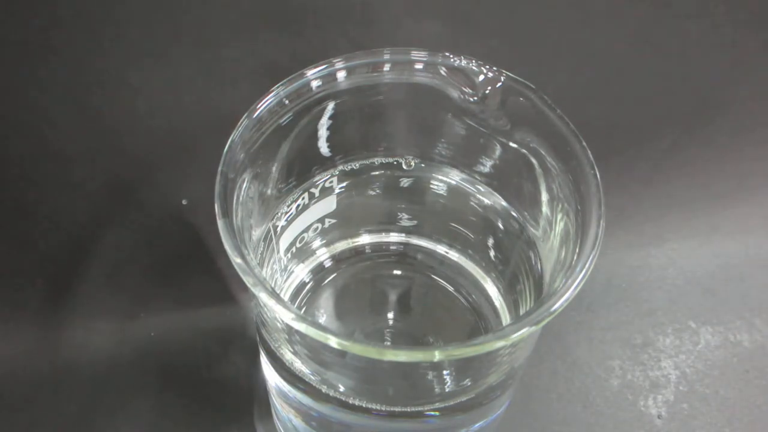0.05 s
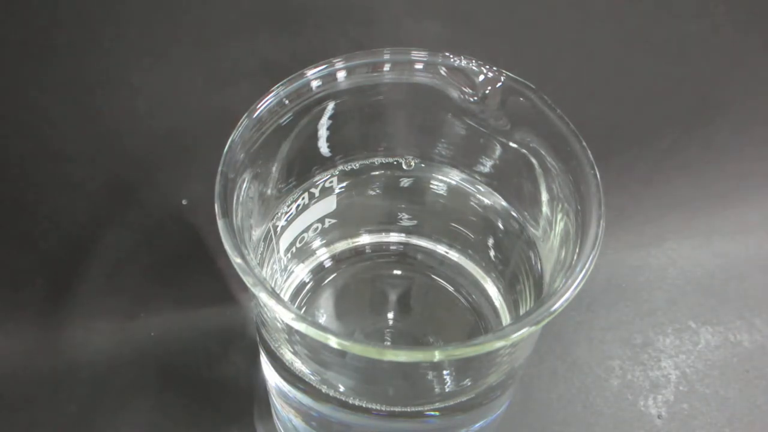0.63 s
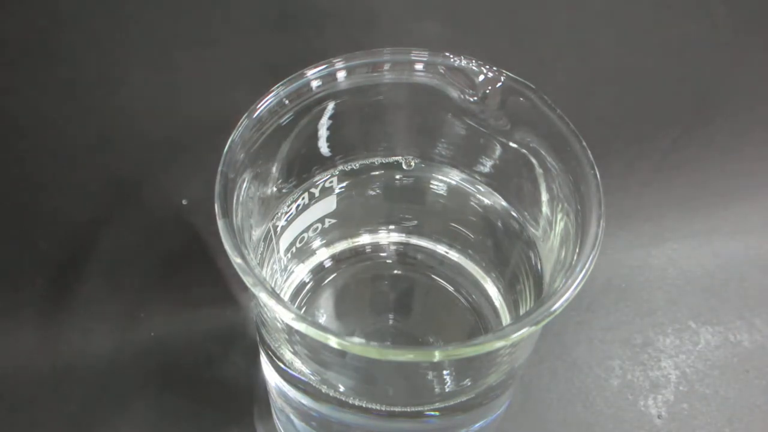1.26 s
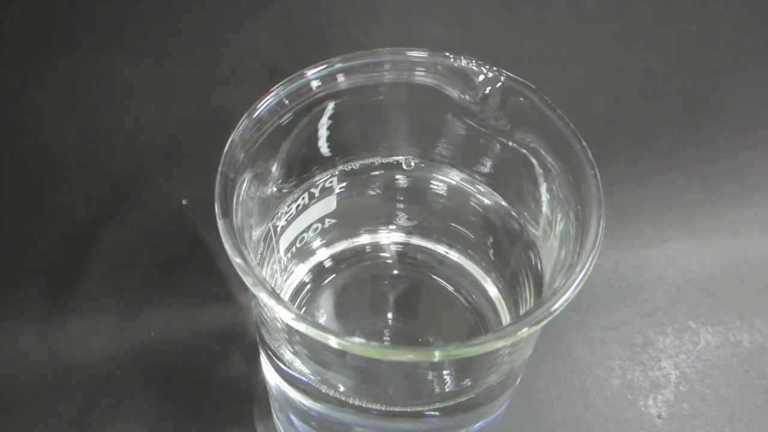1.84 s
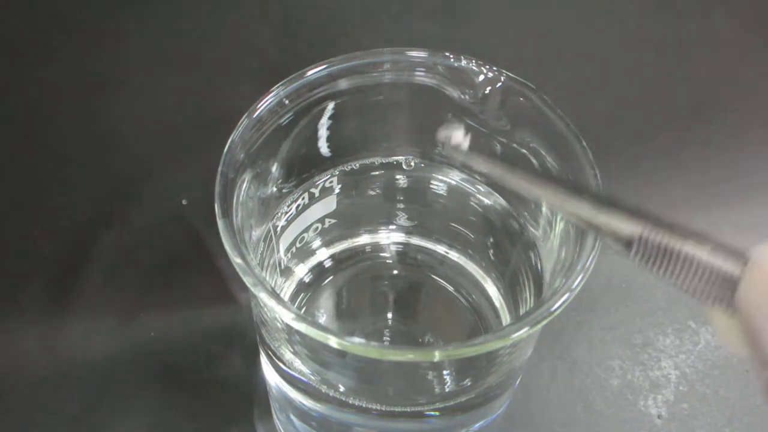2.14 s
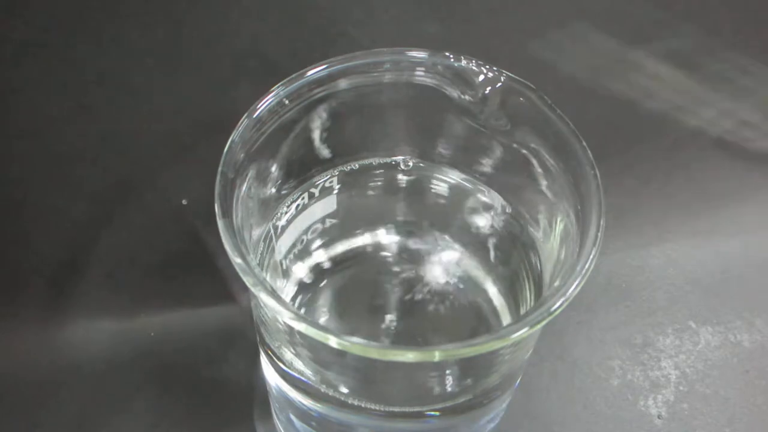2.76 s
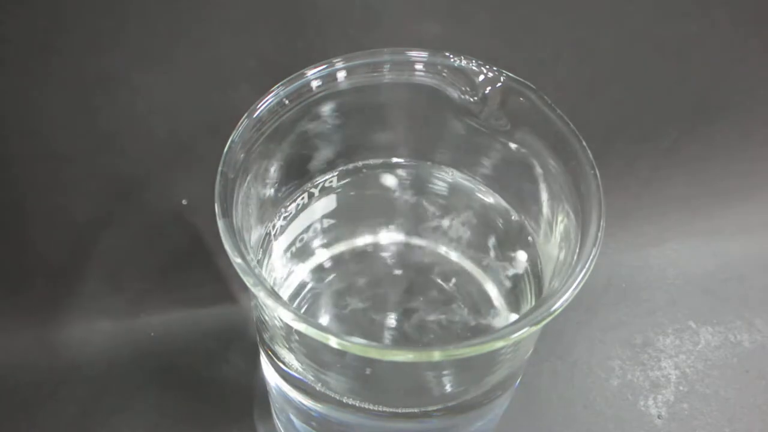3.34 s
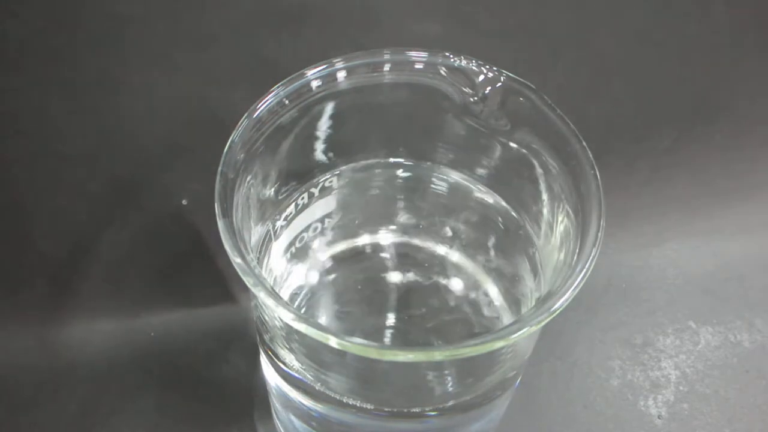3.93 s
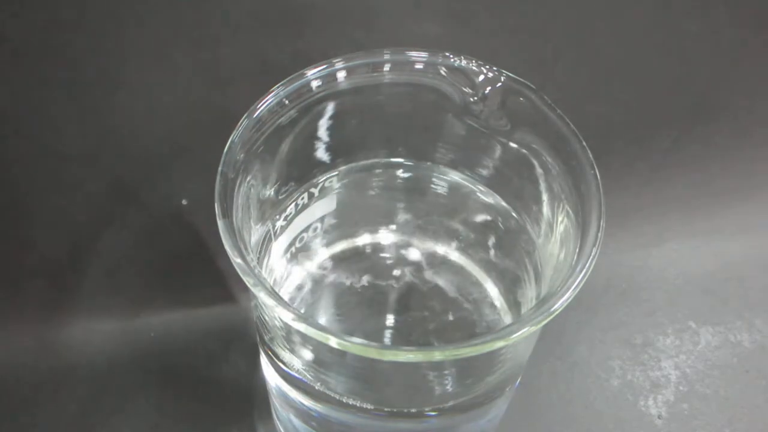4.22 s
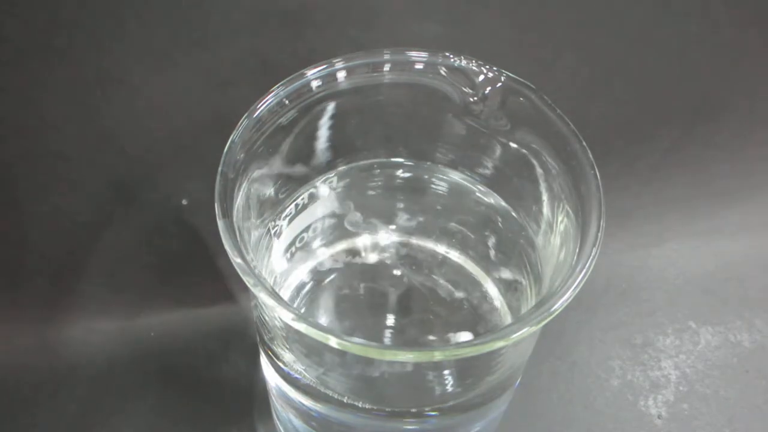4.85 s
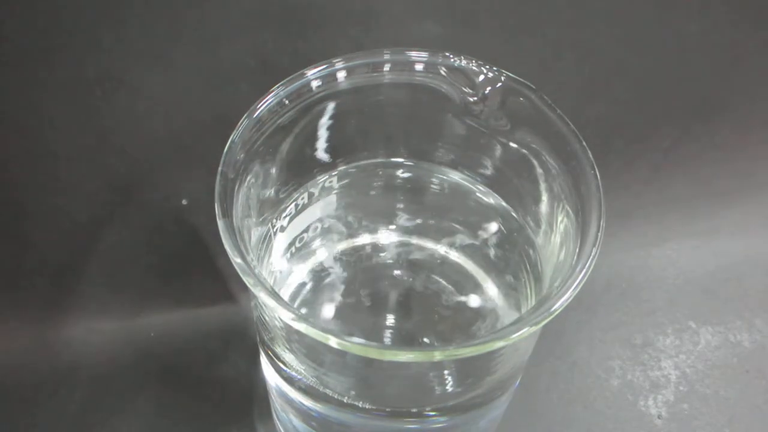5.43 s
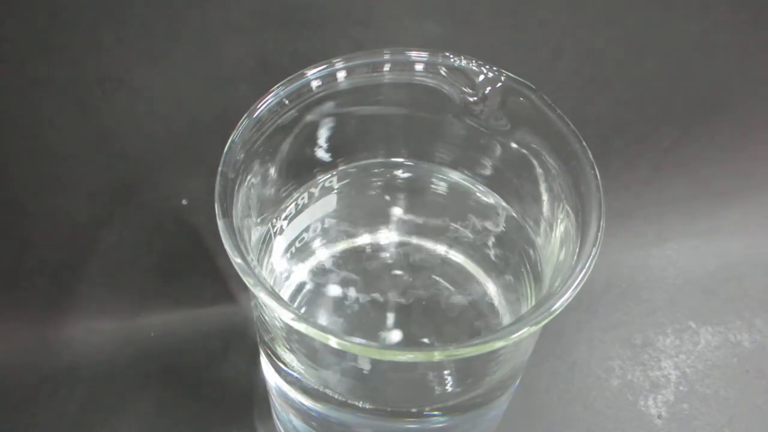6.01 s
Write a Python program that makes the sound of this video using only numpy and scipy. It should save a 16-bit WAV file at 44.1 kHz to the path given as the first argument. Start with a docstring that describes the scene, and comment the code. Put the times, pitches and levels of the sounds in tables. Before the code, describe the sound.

Laboratory ventilation hums softly throughout. During the first two seconds there are a few small taps on the bench, the clearest at about 0.5 seconds, along with a very faint, high pulsing whine, a distant squeak near 0.8 seconds and two soft brushes of a sleeve. At 2.2 seconds steel tweezers hit the rim of a glass beaker with a sharp, close clink and a lighter bounce, and the glass rings briefly. A faint hiss swells. From about 2.8 seconds bits of sodium fizz in the water: a dense, bright sizzle of tiny gas pops, with deeper bubbling underneath that fades by about 4 seconds. The fizz is strongest around 3.5 seconds, then continues fairly steadily until the end at about 6 seconds, its slightly hollow tone shifting as the metal skates around the beaker. The room adds very little echo.

```python
"""A laboratory: ventilation hums under a faint pulsing whine, a few small taps, a far squeak and a sleeve.
At 2.2 s steel tweezers clink on a glass beaker, ringing both, and drop bits of sodium into the water.
A faint hiss swells. From about 2.8 s the metal skates about and fizzes: thousands of tiny gas pops a
second, coloured by the air column of the beaker. The fresh pieces also bubble deeply until they shrink."""
import sys
import numpy as np
from scipy import signal
from scipy.fft import rfft, irfft
from scipy.io import wavfile
from scipy.ndimage import uniform_filter1d

SR = 44100
rng = np.random.default_rng(int(sys.argv[2]) if len(sys.argv) > 2 else 0)


def dump(signal):
    """Clip the signal to [-1, 1] and save it as 16-bit WAV at the path in sys.argv[1]."""
    limited = np.clip(np.atleast_2d(signal).T, -1, 1)
    pcm = np.round(limited * 32767).astype(np.int16)
    wavfile.write(sys.argv[1], SR, pcm)


N = 268128
T, HZ = np.arange(N) / SR, np.fft.rfftfreq(N, 1 / SR)


def amp(db):
    """Decibels to linear gain."""
    return 10 ** (np.asarray(db) / 20)


def unit(x):
    """Scale to an rms of one."""
    return x / np.sqrt(np.mean(x ** 2) + 1e-20)


def curve(points, hz):
    """An EQ-style curve: points joined by straight lines over log frequency."""
    point_hz, value = np.transpose(points)
    return np.interp(np.log(hz + 1), np.log(point_hz + 1), value)


def pan(pan_db):
    """Left and right gains whose mean is one; pan_db is always left minus right."""
    left = np.atleast_1d(amp(pan_db))
    return 2 * np.array([left, np.ones_like(left)]) / (1 + left)


def add(mix, start_s, sound):
    """Lay a sound into the stereo mix."""
    part = mix[:, round(start_s * SR):][:, :sound.shape[-1]]
    part += sound[..., :part.shape[1]]


def drift(rate_hz):
    """A random modulator with an rms of one."""
    knots = np.arange(4096) / (2 * rate_hz)
    return unit(np.interp(T, knots, rng.standard_normal(len(knots))))


def swell(t, peak_s, half_length_s):
    """A bell-shaped fade in and out of height one."""
    return np.exp(-((t - peak_s) / half_length_s) ** 2)


def stereo_spectra(two_noises, correlation, balance):
    """Blend two unrelated noises into left and right spectra, with width and pan set by frequency."""
    a, b = rfft(two_noises)
    shared = np.clip(curve(correlation, HZ), -1, 1)
    return np.array([a, shared * a + np.sqrt(1 - shared ** 2) * b]) * pan(curve(balance, HZ))


# Decay of the room: freq_hz, t60_s
ROOM_DECAY = [(200, .5), (2000, 0.3), (6000, 1), (15000, 0.3)]

def room(x, predelay_s=0.008):
    """A diffuse reverb tail on each side, each band dying at its own speed."""
    noise = rng.standard_normal((2, SR)) * (T[:SR] > predelay_s)
    hz, t, bands = signal.stft(noise, SR, nperseg=256)
    tail = signal.istft(bands * amp(-60 * t / curve(ROOM_DECAY, hz)[:, None]), SR, nperseg=256)[1]
    return signal.fftconvolve(x.mean(0)[None], tail / np.linalg.norm(tail[0]), axes=1)[:, :N]


# Tone of the air bed: freq_hz, gain_db
VENT_EQ = [(41, -29), (70, -7.5), (189, -7), (265, -5.5), (297, -4), (356, -10.5), (535, -15.5), (734, -17),
           (860, -19), (1770, -26), (2320, -30.5), (4090, -40.5), (5610, -42), (14500, -50), (15500, -44.5)]
# Its stereo width: freq_hz, correlation
VENT_CORRELATION = [(60, 0.21), (300, 0.65), (1400, 0.52), (3100, 0.13), (7000, 0.065), (15000, 0.19)]
# Its lean to the left: freq_hz, pan_db
VENT_BALANCE = [(60, 6), (240, 4.5), (950, 1.5), (3770, 0.5), (15000, 1)]
# Fan tones: pitch_hz, level_db, waver_ratio
FAN_TONES = [(45, -60, 0.112), (82.6, -63.5, .045), (95.6, -56.5, 0.0132), (192, -55, 0.0132),
             (294, -57, 0.0118)]

def ventilation(air_db=-46, throb_depth=0.44, throb_hz=4.9, waver_hz=6.44):
    """A bed of dull air noise with fan tones that waver and throb."""
    spectra = stereo_spectra(rng.standard_normal((2, N)), VENT_CORRELATION, VENT_BALANCE)
    air = irfft(spectra * amp(curve(VENT_EQ, HZ)), N)
    hum = 0
    for pitch_hz, level_db, waver_ratio in FAN_TONES:
        cycles = np.cumsum(pitch_hz * (1 + waver_ratio * drift(waver_hz))) / SR
        throb = 1 + throb_depth * drift(throb_hz)
        hum = hum + amp(level_db) * throb * np.sqrt(2) * np.sin(2 * np.pi * cycles)
    return amp(air_db) * unit(air) + pan(2.6) * hum


# Runs of the pulsing whine: start_s, length_s
WHINE_RUNS = [(0.062, .23), (.394, .16), (.556, .16), (1.108, .03), (1.243, .16), (1.408, .23),
              (1.745, .09), (2.083, .1)]

def whine(pitch_hz=5523, level_db=-66.5, period_s=0.0655, pulse_s=0.021, whistle_hz=15735, whistle_db=-79):
    """A thin electric tone pulses in short runs, with a steady whistle at the edge of hearing."""
    out = np.ones((2, 1)) * amp(whistle_db) * np.sin(2 * np.pi * whistle_hz * T)
    t = np.arange(0, pulse_s, 1 / SR)
    pulse = amp(level_db) * signal.windows.tukey(len(t), 0.2) * np.sin(2 * np.pi * pitch_hz * t)
    for start_s, length_s in WHINE_RUNS:
        for at_s in np.arange(start_s, start_s + length_s, period_s):
            add(out, at_s, pulse)
    return out


def squeak(peak_s=0.81, half_length_s=0.11, pitch_hz=872, glide_hz_per_s=170, level_db=-56):
    """A faint far squeak whose unsteady pitch rises a little."""
    hz = (pitch_hz + glide_hz_per_s * (T - peak_s)) * (1 + 0.009 * drift(39))
    return amp(level_db) * swell(T, peak_s, half_length_s) * np.sin(2 * np.pi * np.cumsum(hz) / SR)


# Two sleeve strokes, then a swell of hiss: peak_s, half_length_s, level_db
SOFT_SWELLS = [(1.22, 0.26, -59), (1.776, 0.23, -55), (2.482, 0.32, -50.5)]
# Tone of all three: freq_hz, gain_db
SWELL_EQ = [(300, 1), (1500, 10), (3000, 3.5), (6000, -3), (10000, -7), (15000, -15)]

def sleeve_and_hiss(crossfeed=0.1):
    """Cloth brushes softly twice; a faint hiss swells just after the clink."""
    noise = irfft(rfft(rng.standard_normal((2, N))) * amp(curve(SWELL_EQ, HZ)), N)
    envelope = sum(amp(db) * swell(T, peak_s, half_s) for peak_s, half_s, db in SOFT_SWELLS)
    return pan(3.4) * unit(noise + crossfeed * noise[::-1]) * envelope


# Small handling taps: start_s, level_db, centre_hz, width_hz, t60_s
BENCH_TAPS = [(.187, -52.5, 2150, 800, 0.079), (.461, -42.5, 1060, 1140, 0.12),
              (.533, -69, 11500, 5000, .07), (0.757, -54, 3580, 2500, 0.023)]

def taps():
    """Things handled on the bench: short noise puffs, each in one broad resonance."""
    out, t = np.zeros((2, N)), np.arange(SR // 4) / SR
    for start_s, level_db, centre_hz, width_hz, t60_s in BENCH_TAPS:
        edges_hz = [centre_hz - width_hz / 2, centre_hz + width_hz / 2]
        band = signal.butter(4, edges_hz, "bandpass", fs=SR, output="sos")
        puff = signal.sosfilt(band, rng.standard_normal(len(t)) * amp(level_db - 60 * t / t60_s))
        makeup_gain = np.sqrt(SR / 2 / width_hz)
        add(out, start_s, pan(4.1) * puff * makeup_gain)
    return out


def ring(modes):
    """Damped sines set off by one blow, each with its own pan."""
    t = T[:SR]
    pitch_hz, gain_db, t60_s, pan_db = np.transpose(modes)
    decays = amp(gain_db[:, None] - 60 * t / t60_s[:, None])
    return pan(pan_db) @ (decays * np.sin(2 * np.pi * pitch_hz[:, None] * t))


# Ring of the beaker wall: pitch_hz, gain_db, t60_s, pan_db
GLASS_MODES = [(2256, -25.5, 1.3, 0), (2300, -24, 0.66, 3), (2560, -6, 0.09, 7), (3834, -18, 0.57, 9),
               (4356, -6, 0.17, 8), (5920, -10.5, .33, 8), (6013, -0.5, .22, 3), (6110, 4, 0.08, 20),
               (10280, -9, .09, 10)]
# Bright ping of the tweezers: pitch_hz, gain_db, t60_s, pan_db
STEEL_MODES = [(4635, 0, .081, 12), (4700, -5, .025, 10), (7020, -25, .06, 0), (7510, -6, .09, 6),
               (7617, -11, .08, -5), (7965, -1, .04, 9), (8533, -14, .13, 8), (9281, -16, .085, -3),
               (10100, -23, .12, 3), (10570, -9, .08, 3), (10740, -2, .012, 4), (10840, -14, .075, 8),
               (11450, -23, .067, 9), (12450, -20, .08, 10), (13040, -23, .075, 9), (14160, -26, .05, 6),
               (14520, -27, .06, 1), (15190, -16, .056, 0)]
# Dead knock of the air column, water and bench: pitch_hz, gain_db, t60_s, pan_db
KNOCK_MODES = [(242, -38, 0.15, 2), (326, -36, 0.2, 14), (434, -31, 0.092, 7), (502, -20.5, 0.033, 4),
               (633, -34, 0.11, 0), (1580, -1, 0.0089, 6), (1870, -4.5, 0.0083, 8),
               (2370, -17.5, 0.021, -4), (3050, -15, 0.0061, 21), (3560, -20, 0.01, -12)]
# Hits on the rim, with a fader for each layer: start_s, glass_db, steel_db, knock_db
RIM_HITS = [(2.2048, -23.5, -9, 1.5), (2.2727, -31.5, -40, -16), (2.314, -49, -60, -24.5)]

def clinks(contact_s=0.001, graze_s=0.0011, scrape_db=-13, scrape_t60_s=0.076):
    """Each hit rings the tweezers and knocks the beaker; the glass builds up as the steel grazes it."""
    out, t = np.zeros((2, N)), T[:SR]
    glass = ring(GLASS_MODES) * (1 - np.exp(-t / graze_s))
    steel, knock = ring(STEEL_MODES), ring(KNOCK_MODES)
    attack = 1 - np.exp(-t / contact_s)
    for start_s, glass_db, steel_db, knock_db in RIM_HITS:
        scrape = pan(3.5) * amp(scrape_db - 60 * t / scrape_t60_s) * rng.standard_normal((2, len(t)))
        hit = amp(glass_db) * glass + amp(steel_db) * (steel + scrape) + amp(knock_db) * knock
        add(out, start_s, hit * attack)
    return out


# Path of the skating metal: time_s, across_steps, along_steps
SKATE_PATH = [(2.9, -5, -2.1), (3.06, 2.5, -1.2), (3.301, 1.2, 1), (3.62, 0.7, -.5), (3.9, -1.7, 0),
              (4.08, -2.3, -0.4), (4.35, -0.5, 0.5), (4.68, -4, -1.3), (4.92, 0.5, 1.54),
              (5.15, -0.3, -0.2), (5.43, 1.7, -1.4), (5.73, 2, -0.2), (5.88, 1.4, 0.9), (6.08, -2.5, -0.5)]
# Air modes above the water, before sharpening:
# centre_hz, width_hz, left_db, right_db, across_db_per_step, along_db_per_step
AIR_MODES = [(1308, 570, 9, 9, 0, 0.7), (1550, 343, 6, 6.5, 0.3, 0), (3044, 306, 7.5, 2.5, 1.1, -2.2),
             (4577, 159, 7, 0, 1.3, 1.5), (4760, 180, 8, 1.2, 1, 0.2), (5660, 130, 1.5, 4, -1, 4.5),
             (6205, 170, 5, 0, 1.8, 2), (7680, 260, 3.5, 1.5, 0.1, 2.5), (9460, 116, -1, 3, -2.5, 1.5),
             (9650, 161, 1.5, 4, 1, .5), (10050, 230, 4.5, 1.5, 0.2, 0.5), (11130, 148, 4, 5.5, -0.5, 2.5),
             (12000, 214, -1, 3, -2, 6)]
# The metal runs up to the wall and away again: peak_s, half_length_s, closeness_ratio
WALL_PASSES = [(2.896, 0.11, 0.8), (3.998, 0.21, 1.0)]
# The close wall's echo cancels some bands and lifts others: freq_hz, gain_db
WALL_ECHO_EQ = [(2800.0, 0.8), (3500.0, -0.6), (4200.0, -4.1), (5100.0, -3.6), (5800.0, 3.2),
                (7000.0, -0.8), (8100.0, -2.0), (9000.0, 4.6), (10500.0, -0.7), (15000.0, -0.7)]

def beaker_eq_db(hz, t, upper_mode_sharpness=1.88, shimmer_db=2.34):
    """The air column as a moving EQ (channel, frequency, time): the metal's place picks the modes."""
    time_s, across_steps, along_steps = np.transpose(SKATE_PATH)
    across, along = np.interp(t, time_s, across_steps), np.interp(t, time_s, along_steps)
    centre_hz, width_hz, left_db, right_db, per_across, per_along = np.transpose(AIR_MODES)
    travel_db = np.outer(per_across, across) + np.outer(per_along, along)
    peak_db = np.array([left_db, right_db])[:, :, None] + travel_db
    # resonances above 4 kHz ring higher and narrower
    sharpness = np.where(centre_hz > 4000, upper_mode_sharpness, 1.1)
    bells = sharpness * (1 + (2 * sharpness * (hz - centre_hz) / width_hz) ** 2) ** -1.5
    modes_db = bells @ np.maximum(peak_db, 0)
    near_wall = sum(closeness * swell(t, peak_s, half_s) for peak_s, half_s, closeness in WALL_PASSES)
    # the many weaker high modes come and go at random
    shimmer = uniform_filter1d(rng.standard_normal(modes_db.shape), size=60, axis=2)
    shimmer = unit(uniform_filter1d(shimmer, size=3, axis=1)) * np.minimum(hz / 6000, 1)
    return modes_db + curve(WALL_ECHO_EQ, hz) * near_wall + shimmer_db * shimmer


# Tone of a gas pop: freq_hz, gain_db, pan_db
POP_EQ = [(350.0, -2.8, 3.3), (700.0, -4.9, 2.8), (1000.0, -1.0, 1.6), (1600.0, -1.3, 0.1),
          (1950.0, -3.1, 0.0), (2500.0, 1.9, -0.1), (3300.0, 3.4, 1.4), (3900.0, -0.9, -0.1),
          (5000.0, 2.3, 3.0), (7000.0, 1.5, 4.8), (10000.0, 2.4, 3.6), (13000.0, 1.2, 4.6),
          (14500.0, -2.1, 3.8), (15800.0, -7.6, 4.6)]
# Stereo width of the spray: freq_hz, correlation
POP_CORRELATION = [(300, 0.6), (1000, 0.99), (1500, 1), (2550, 1), (3060, 0.68), (3900, 1), (5000, .7),
                   (7500, 0.61), (15000, 0.24)]

def gas_pops(pops_per_s=2500, spread_db=2.5, rattle_s=0.00071, steam=1.0, sputter_db=-0.4, sputter_hz=90):
    """A lightly sputtering spray of tiny gas pops over a hiss of steam."""
    sizes = amp(spread_db * np.minimum(rng.exponential(1, N), 5))
    impulses = sizes * (rng.random(N) < pops_per_s / SR)
    # each pop rattles briefly between the glass walls
    energy = signal.lfilter([1], [1, -np.exp(-1 / (rattle_s * SR))], impulses ** 2)
    envelope = np.hypot(unit(np.sqrt(energy)), steam) * amp(sputter_db * drift(sputter_hz))
    spray = unit(envelope * rng.standard_normal((2, N)))
    freq_hz, gain_db, pan_db = np.transpose(POP_EQ)
    low_cut = HZ ** 2 / (HZ ** 2 + 120 ** 2)  # tiny pops carry no bass
    tone = amp(curve(np.c_[freq_hz, gain_db], HZ)) * low_cut
    return irfft(stereo_spectra(spray, POP_CORRELATION, np.c_[freq_hz, pan_db]) * tone, N)


# Fader ride of the reaction: time_s, strength_db
FIZZ_RIDE = [(2.66, -58.5), (2.83, -32), (2.88, -35), (2.9, -32), (2.96, -34), (3.1, -29.5), (3.15, -31),
             (3.49, -25.5), (3.68, -30.5), (4.14, -32), (4.34, -30.5), (4.58, -31.5), (4.86, -30.5),
             (5.29, -32), (5.31, -35), (5.61, -31.5), (5.8, -33.5), (6.08, -32.5)]

def fizz(warmup_db_per_s=80, usual_db=-31.5, crossover_hz=2300, sizzle_trim_db=1.2,
         body_start_s=2.73, body_rise_s=0.1, body_follow=0.75, body_trim_db=0.62,
         bubbling_boost_db=7, bubbling_hz=850, bubbling_fade_s=0.94):
    """Sodium gives off gas: a sizzle of tiny pops over a body of large bubbles, heard through the beaker."""
    hz, t, bands = signal.stft(gas_pops(), SR, nperseg=1024, noverlap=768)
    hz = hz[:, None]
    time_s, ride_db = np.transpose(FIZZ_RIDE)
    warmup_db = warmup_db_per_s * np.minimum(t - time_s[0], 0)  # the reaction builds as the metal heats
    strength_db = np.interp(t, time_s, ride_db) + warmup_db
    sizzle = amp(sizzle_trim_db + strength_db)
    # large bubbles start late and follow only a share of each surge around the usual strength
    fade_in = 1 - np.exp(-np.maximum(t - body_start_s, 0) / body_rise_s)
    body = fade_in * amp(body_trim_db + usual_db + body_follow * (strength_db - usual_db))
    # the fresh, large pieces also bubble deeply; that fades as they shrink
    bubbling_db = bubbling_boost_db * swell(t, body_start_s, bubbling_fade_s) / (1 + (hz / bubbling_hz) ** 4)
    lows = 1 / (1 + (hz / crossover_hz) ** 6)
    gain = (lows * body * amp(bubbling_db) + (1 - lows) * sizzle) * amp(beaker_eq_db(hz, t))
    return signal.istft(bands * gain, SR, nperseg=1024, noverlap=768)[1][:, :N]


def scene(reverb_db=-24):
    """The bench sounds with a touch of room, over the dry background layers."""
    bench = clinks() + fizz() + taps()
    return bench + amp(reverb_db) * room(bench) + ventilation() + sleeve_and_hiss() + whine() + squeak()


def record(dry, threshold_db=-21, duck_db_per_db=0.27, release_db_per_s=4, ceiling=0.85, cutoff_hz=15850):
    """Gain control ducks at the clink and creeps back; then a soft clip and a steep high cut."""
    power_db = 10 * np.log10(abs(uniform_filter1d((dry ** 2).mean(0), size=200)) + 1e-12)
    release_db = T * release_db_per_s
    held_db = np.maximum.accumulate(power_db + release_db) - release_db
    over_db = np.maximum(held_db - threshold_db, 0)
    ducked = dry * amp(-duck_db_per_db * uniform_filter1d(over_db, size=100))
    rounded = ducked / (1 + (ducked / ceiling) ** 8) ** (1 / 8)
    high_cut = signal.firwin(801, cutoff_hz, window=("kaiser", 9), fs=SR)
    return signal.oaconvolve(rounded, high_cut[None], "same")


dry = scene()
out = record(dry)
dump(out)
```